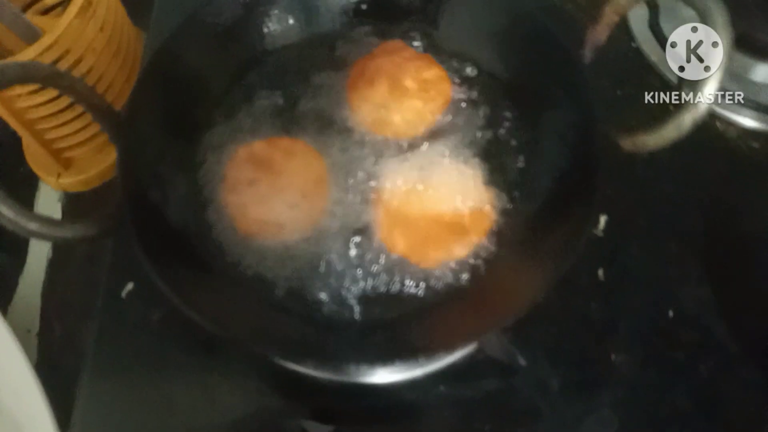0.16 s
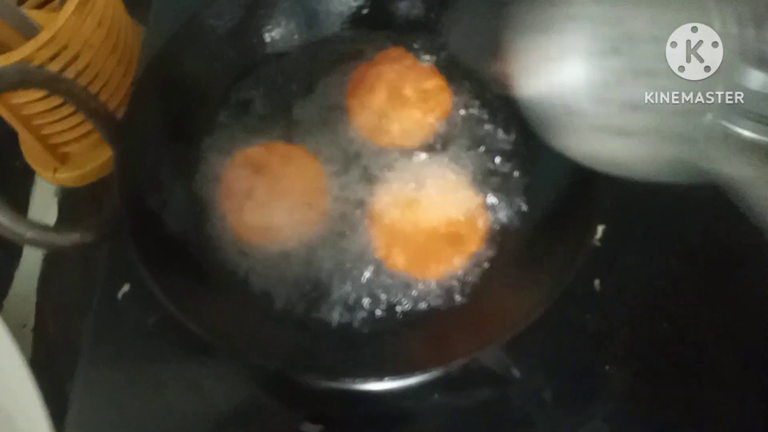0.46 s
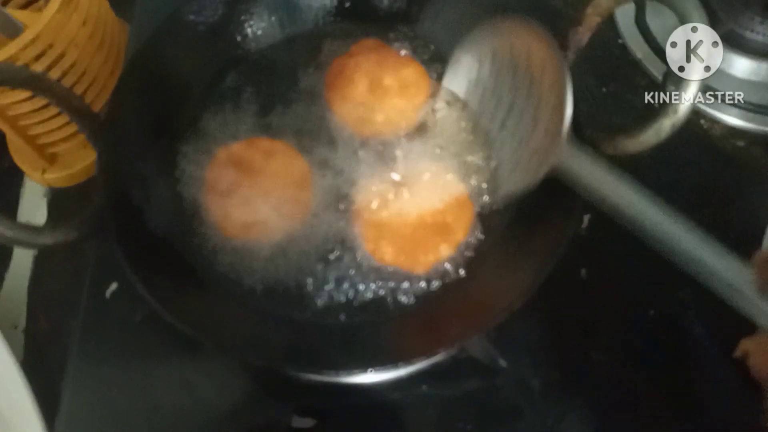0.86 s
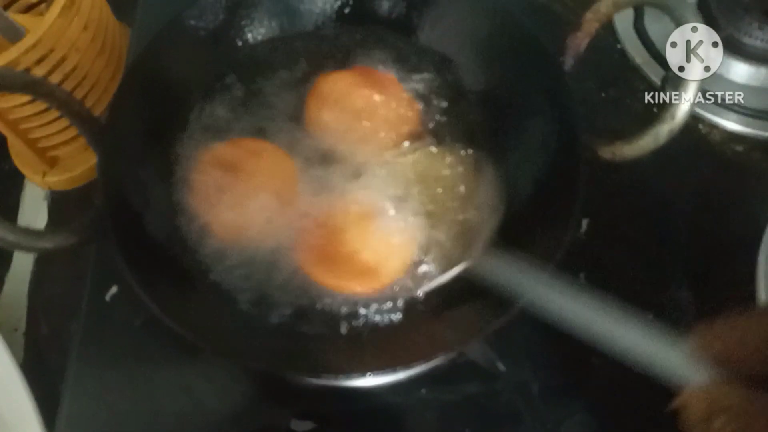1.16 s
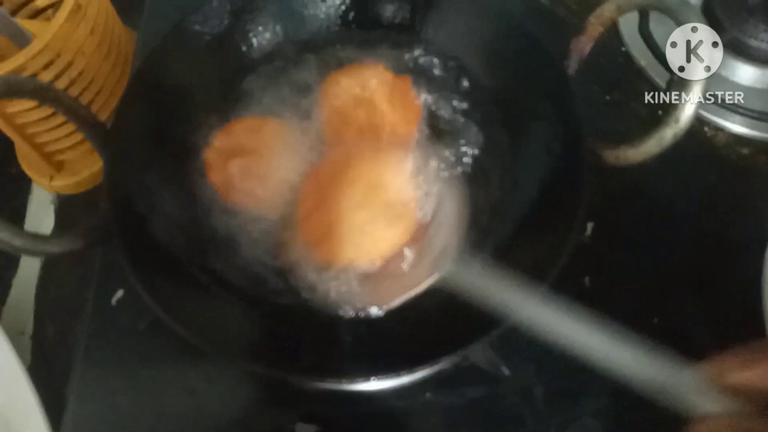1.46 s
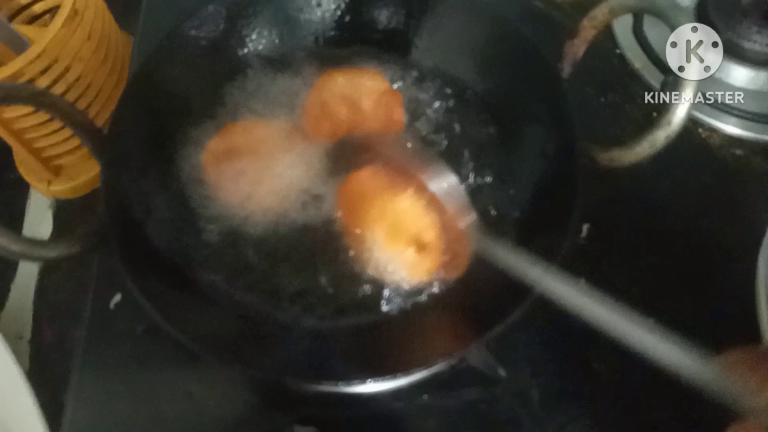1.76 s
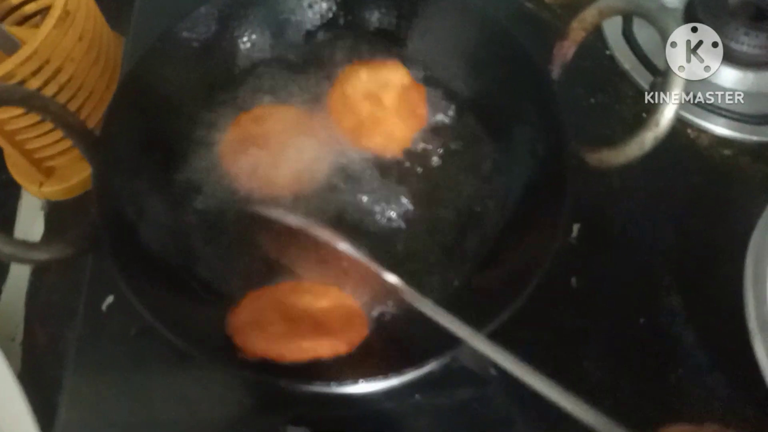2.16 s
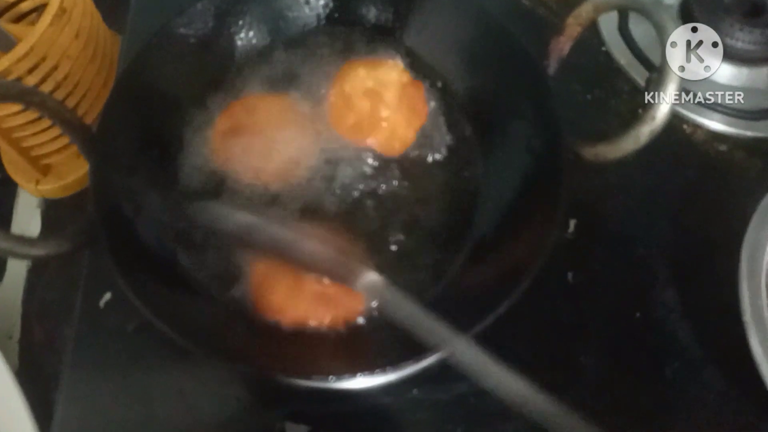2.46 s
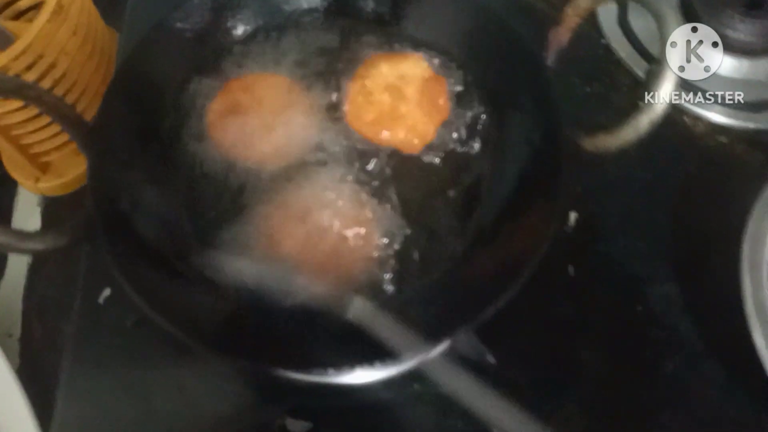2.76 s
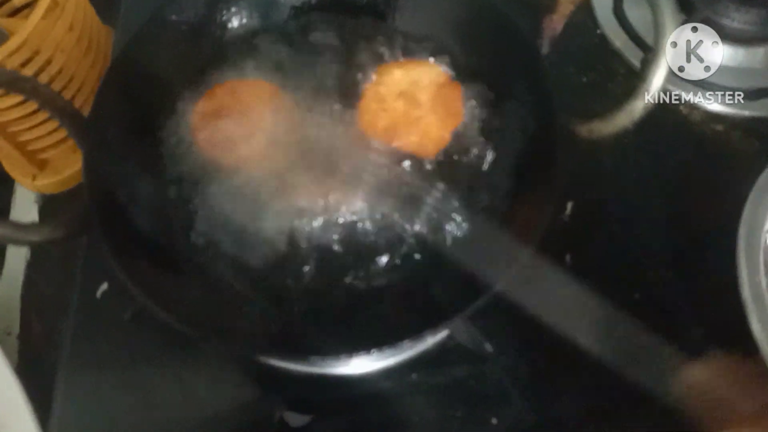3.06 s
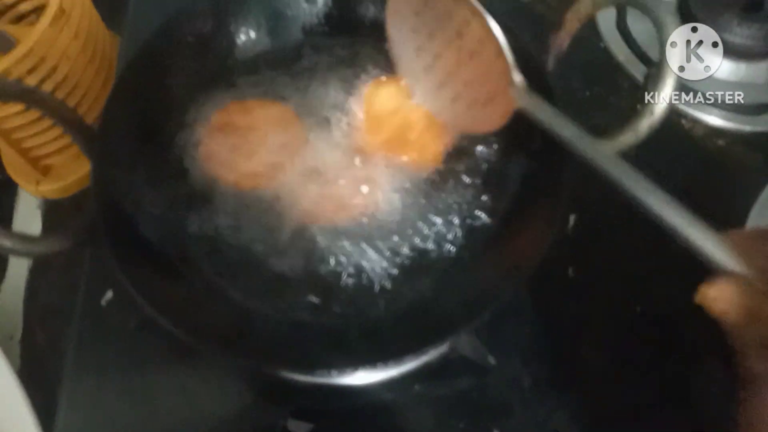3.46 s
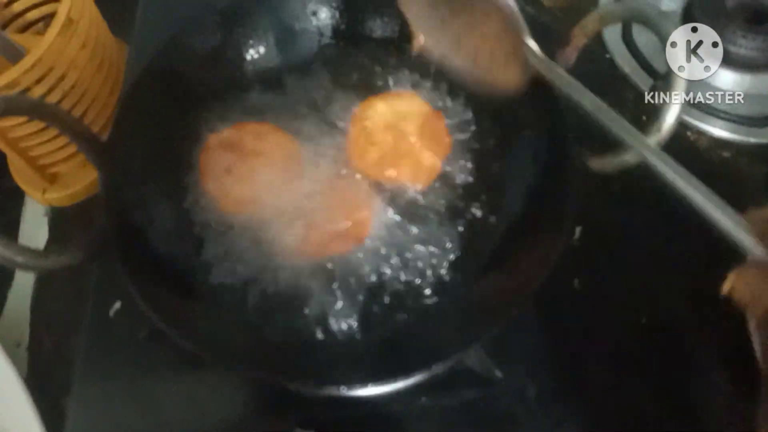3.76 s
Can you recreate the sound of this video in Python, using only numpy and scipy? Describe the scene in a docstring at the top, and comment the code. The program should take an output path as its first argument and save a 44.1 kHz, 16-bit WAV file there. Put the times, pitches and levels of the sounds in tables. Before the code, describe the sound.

Dough rounds sizzle and crackle steadily in hot oil, with spoon taps and dull pan bumps.

```python
"""In a small kitchen, dough rounds fry in hot oil in a steel pan, heard from close above.
Thousands of tiny steam bubbles burst each second as clumped filtered clicks; larger ones ring, a few spit.
A slotted spoon taps the pan with scraped noise and ringing steel, stirs up gurgles and turns one round.
Dull bumps, a rocking pan, an uneven rumble and a faint hum lie below, made of narrow noise and sines."""
import sys
import numpy as np
from scipy import signal
from scipy.fft import rfft, irfft
from scipy.io import wavfile

SR = 44100
rng = np.random.default_rng(int(sys.argv[2]) if len(sys.argv) > 2 else 0)


def store_pcm(level_fs):
    """Save levels as 16-bit WAV."""
    pcm = np.round(np.clip(level_fs, -1, 1) * 32767).astype(np.int16)
    wavfile.write(sys.argv[1], SR, np.atleast_2d(pcm).T)


N = 171990  # length in samples
T = np.arange(N) / SR  # time in seconds


def from_db(db):
    """Decibels to gain."""
    return 10 ** (np.asarray(db) / 20)


def rms_one(x):
    """Scale to an rms of one."""
    return x / np.sqrt(np.mean(x ** 2) + 1e-20)


def curve(rows):
    """Join (seconds, value) points by straight lines."""
    return np.interp(T, *np.transpose(rows))


def drift(rate):
    """Slow chance with a spread of one: noise through two equal low-passes at rate Hz."""
    step = 40  # samples between slow values
    pole = np.exp(-2 * np.pi * rate * step / SR)
    noise = rng.standard_normal(N // step + 2002)
    slow = signal.lfilter([1], [1, -2 * pole, pole * pole], noise)[2000:]  # skip the filter's start
    return np.interp(np.arange(N) / step, np.arange(len(slow)), rms_one(slow))


def resonate(x, hz, width):
    """One resonance, width in Hz, with a gain of one on top."""
    b, a = signal.iirpeak(min(hz, SR / 2 - 1), hz / min(width, SR / 4), fs=SR)
    return signal.lfilter(b, a, x + 1e-18)


def resonate_twice(x, hz, q):
    """Two equal resonances in a row give steeper sides."""
    return resonate(resonate(x, hz, hz / q), hz, hz / q)


def resonant_noise(resonances):
    """Noise through a set of steep-sided resonances, rms one."""
    total = 0
    for hz, width, db in resonances:
        narrow = resonate(rng.standard_normal(N), hz, width)
        total = total + from_db(db) * rms_one(resonate(narrow, hz, 4 * width))
    return rms_one(total)


def clicks(per_s, spread_db):
    """Random clicks of either sign, many small and few large."""
    chance, size, sign = rng.random(N), rng.exponential(1, N), rng.choice([-1, 1], N)
    return (chance < per_s / SR) * sign * from_db(spread_db * np.minimum(size, 6))


def ringing(per_s, spread_db, cycles, hz):
    """Bubbles of one pitch, each dying by 60 dB over some cycles."""
    return resonate(clicks(per_s, spread_db), hz, np.log(1000) / np.pi * hz / cycles)


def click_at(s):
    """A single unit click."""
    return 1. * (np.arange(N) == int(s * SR))


def dying(s, t60):
    """An envelope that starts at s and falls 60 dB in t60 seconds."""
    return (T >= s) * np.exp(-np.log(1000) * np.clip((T - s) / t60, 0, 10))


def swell(s, length):
    """An envelope that peaks after half its length and fades."""
    u = np.clip(2 * (T - s) / length, 0, 20)
    return u * np.exp(1 - u)


def struck(s, modes):
    """Modes set ringing by a blow at s, each a dying sine."""
    return sum(from_db(db) * np.sin(2 * np.pi * hz * (T - s)) * dying(s, t60) for hz, db, t60 in modes)


def colour(x, points):
    """A causal, minimum-phase filter with the given (Hz, dB) response."""
    size = 4096
    hz, db = np.transpose(points)
    log_bins = np.log(np.arange(size // 2 + 1) * SR / size + 1)
    cepstrum = irfft(np.log(from_db(np.interp(log_bins, np.log(hz), db))))
    # fold the cepstrum to make the response causal
    cepstrum[1:size // 2] *= 2
    cepstrum[size // 2 + 1:] = 0
    return signal.fftconvolve(x, irfft(np.exp(rfft(cepstrum))))[:N]


PATCH_DB, PATCHES_PER_S, PATCH_MEAN_DB = 6, 6, -1.5


def patchy(x, count=9):
    """Narrow bands of the lower middle swell and sink, each on its own."""
    edges, out = np.geomspace(260, 1450, count + 2), x
    hz, spectrum = np.arange(N // 2 + 1) * SR / N, rfft(x)
    for k in range(count):
        band = irfft(spectrum * np.interp(hz, edges[k:k + 3], [0, 1, 0]), N)
        gain = from_db(PATCH_MEAN_DB + PATCH_DB * np.minimum(drift(PATCHES_PER_S), 1))
        out = out + band * (gain - 1)
    return out


ROOM_T60_S, NEAR_T60_S, NEAR_DB = 0.16, 0.045, 16


def kitchen(x):
    """Quick reflections from the pan wall and stove, then the tail of the room, as dying noise."""
    t = T[:SR // 3]
    tail = (t > .004) * from_db(-60 * t / ROOM_T60_S)
    near = from_db(NEAR_DB) * (t > .0005) * from_db(-60 * t / NEAR_T60_S)
    echo = rng.standard_normal(len(t)) * (tail + near)
    return signal.fftconvolve(x, echo / np.sqrt(np.sum(echo ** 2)))[:N]


ROOM_LEFT_DB, ROOM_RIGHT_DB, RIGHT_DIRECT_DB = -6.5, 2.5, -4


def from_spot(x, offset_s):
    """One place in the pan reaches each port with its own delay and reflections."""
    direct = np.roll(x, int(offset_s * SR))
    left = x + from_db(ROOM_LEFT_DB) * kitchen(x)
    right = from_db(RIGHT_DIRECT_DB) * direct + from_db(ROOM_RIGHT_DB) * kitchen(x)
    return np.array([left, right])


# Vigour of the frying. Each row: time in seconds, relative level in dB.
VIGOUR = [(0, -14), (.1, -4), (.21, -3.5), (.24, 1.5), (.62, -1), (.76, -0.5), (.88, 0), (1.0, 0.5),
          (1.28, 1), (1.33, -2.5), (1.4, 1), (1.62, 0), (1.7, -0.5), (2.0, -1.5), (2.4, -1), (2.8, 0),
          (3.2, 0.5), (3.9, -1)]


def vigour_db():
    """How hard the oil fries from moment to moment."""
    return curve(VIGOUR)


# Brief dips in level. Each row: start in seconds, depth in dB, length in seconds.
DIPS = [(0.16, 4.5, 0.02), (0.661, 5, 0.019), (0.8, 11, 0.028), (1.65, 4.5, 0.01)]


def dips():
    """The level of the frying and the low layers dips briefly."""
    return from_db(-sum(db * swell(s, length) for s, db, length in DIPS))


# The spoon stirs the oil. Each row: time in seconds, gurgle level in dB.
STIR = [(0, -81), (.38, -79), (.395, -43.5), (.57, -68), (.66, -48), (.78, -48), (.85, -69), (1.15, -59),
        (1.27, -44), (1.34, -66), (1.43, -42.5), (1.56, -69), (1.665, -66), (1.68, -41), (1.71, -50),
        (1.85, -74), (2.4, -76), (2.78, -61), (2.86, -45), (3.05, -56), (3.29, -40.5), (3.36, -54.5),
        (3.9, -58)]
GURGLES_PER_S, GURGLE_SPREAD_DB, GURGLE_CYCLES = 700, 3.5, 18
GURGLE_TILT_DB = -7  # per octave upwards


def gurgle(count=16):
    """Big, low bubbles ring where the spoon moves the oil."""
    total = 0
    for hz in np.geomspace(380, 1700, count):
        rings = rms_one(ringing(GURGLES_PER_S / count, GURGLE_SPREAD_DB, GURGLE_CYCLES, hz))
        total = total + from_db(GURGLE_TILT_DB * np.log2(hz / 1000)) * rings
    return from_db(curve(STIR)) * rms_one(total)


# Faint ring of the pan under the frying. Each row: pitch in Hz, width in Hz, relative level in dB.
PAN_RING = [(497, 45, -5.5), (704, 34, -6), (1075.6, 18, -1), (1173, 19, -2)]
PAN_RING_DB, FLOOR_DB, FLOOR_HZ = -56, -58, 506


def murmur():
    """Gurgling oil, the faint ring of the pan and the dull floor of the kitchen, as patchy noise."""
    floor = rms_one(resonate(rng.standard_normal(N), FLOOR_HZ / 2, FLOOR_HZ))
    steady = from_db(PAN_RING_DB) * resonant_noise(PAN_RING) + from_db(FLOOR_DB) * floor
    return patchy(gurgle() + from_db(vigour_db() / 2) * steady)  # follows half the vigour in dB


# Low rumble. Each row: time in seconds, level in dB.
RUMBLE = [(0, -66), (.13, -63), (.22, -45.5), (.36, -52.5), (.48, -41.5), (.72, -47), (.83, -35), (.9, -44),
          (1.1, -52), (1.55, -45.5), (1.9, -49), (2.1, -58.5), (2.5, -53), (2.7, -53.5), (3.0, -42),
          (3.08, -51), (3.38, -42), (3.58, -56), (3.76, -44.5), (3.9, -55)]
# Resonances of the rumble. Each row: pitch in Hz, width in Hz, relative level in dB.
RUMBLE_TONES = [(107.4, 16.6, -2), (130.5, 19, -10.5), (234.3, 35, -11)]
RUMBLE_FLUTTER_DB, FLUTTERS_PER_S = 2.5, 11.6


def rumble():
    """Narrow bands of low noise with a fluttering level."""
    level_db = curve(RUMBLE) + RUMBLE_FLUTTER_DB * drift(FLUTTERS_PER_S)
    return from_db(level_db) * resonant_noise(RUMBLE_TONES)


# A faint hum comes and goes. Each row: start in seconds, length in seconds, pitch in Hz, level in dB.
HUMS = [(.55, 0.35, 586, -47.5), (.84, 0.307, 594, -45), (1.195, 0.14, 570, -40), (1.51, 0.24, 565, -43.5),
        (2.632, 0.67, 561.6, -44.5), (3.59, 0.21, 584, -45.5)]
HUM_WAVER_HZ, HUM_FLUTTER_DB = 4, 2


def hum():
    """A faint sine, wavering in pitch and level, fades in and out."""
    waver = HUM_WAVER_HZ * drift(FLUTTERS_PER_S)
    flutter = from_db(HUM_FLUTTER_DB * drift(FLUTTERS_PER_S))
    total = 0
    for s, length, hz, db in HUMS:
        fade = np.sqrt(np.sin(np.pi * np.clip((T - s) / length, 0, 1)) + 1e-12)
        total = total + from_db(db) * fade * np.sin(2 * np.pi * np.cumsum(hz + waver) / SR)
    return flutter * total


# The round is pushed and turned. Each row: start in seconds, low boom in dB, knock in dB, length in seconds.
BUMPS = [(0.373, -75, -52, 0.022), (0.766, -53, -41.5, 0.052), (1.416, -40, -45.5, 0.078),
         (1.67, -49, -41, 0.035), (2.832, -35.5, -41.5, 0.082), (3.25, -42.5, -41.5, 0.068)]
# Resonances of the boom. Each row: pitch in Hz, width in Hz, relative level in dB.
BOOM = [(67, 30, -14), (105.7, 15, 1), (129.4, 35, -0.5)]
# Resonances of the knock. Each row: pitch in Hz, width in Hz, relative level in dB.
KNOCK = [(240, 18, -8.5), (311, 24, -7), (362, 54, -18.5), (460, 49, -7), (868, 25, -32)]


def bumps():
    """Dull bumps: short swells of resonant noise, a low boom under a higher knock."""
    boom = sum(from_db(db) * swell(s, length) for s, db, _, length in BUMPS)
    knock = sum(from_db(db) * swell(s, length) for s, _, db, length in BUMPS)
    return boom * resonant_noise(BOOM) + knock * resonant_noise(KNOCK)


# The pan rocks on its stand. Each row: start in seconds, level in dB, pitch in Hz.
THUMPS = [(.748, -37.5, 240), (.768, -29.5, 99), (1.183, -36.5, 304), (3.092, -19.5, 450),
          (3.11, -23.5, 270), (3.152, -24.5, 142)]
# Ring of the pan on its stand. Each row: pitch in Hz, relative level in dB, 60 dB decay in seconds.
STAND = [(106, 4.5, 0.16), (132, -4.5, 0.32), (264, -12, .25), (305, 3.5, 0.27), (383, -2.5, 0.18),
         (434, 3, 0.12), (492, 2, .14), (875, -11.5, 0.17)]
THUMP_RISE_S, THUMP_FOCUS_DB = 0.0084, 5.5  # a soft blow builds up; loss one octave from its pitch


def thumps():
    """The pan rocks on its stand; each soft blow wakes mostly the modes near its own pitch."""
    out = 0
    for s, level_db, pitch in THUMPS:
        modes = [(hz, db - THUMP_FOCUS_DB * np.log2(hz / pitch) ** 2, t60) for hz, db, t60 in STAND]
        rise = np.clip((T - s) / THUMP_RISE_S, 0, 1)
        out = out + from_db(level_db) * rise * struck(s, modes)
    return out


# The spoon touches the pan. Each row: start in seconds, scrape in dB, scrape pitch in Hz, ring in dB.
TAPS = [(0.6692, 2.5, 7160, -31), (0.696, 1, 7100, -28), (0.8122, -11, 12700, -32), (.814, 1, 12600, -42),
        (1.6681, 1, 11900, -36), (1.6696, -5, 5400, -14.5)]
# Ring of spoon and pan. Each row: pitch in Hz, relative level in dB, 60 dB decay in seconds.
STEEL = [(770, 11, 0.084), (1115, -6.5, 0.14), (1210, 1, 0.046), (1765, -2.5, 0.065), (3072, 2, 0.049),
         (3100, -20, .044), (4060, -7, 0.1), (4700, -13, 0.055), (7230, 2, 0.067)]
SCRAPE_T60_S, SCRAPE_Q = 0.008, 1.6


def spoon():
    """Each touch is a tiny scrape of noise and a ring of steel, damped by the oil."""
    out = 0
    for s, scrape_db, hz, ring_db in TAPS:
        scrape = rms_one(resonate(rng.standard_normal(N), hz, hz / SCRAPE_Q)) * dying(s, SCRAPE_T60_S)
        out = out + from_db(scrape_db) * scrape + from_db(ring_db) * struck(s, STEEL)
    return out


# Flurries of larger bubbles. Each row: start in seconds, level in dB, pitch in Hz.
FLURRIES = [(.233, -14.5, 2420), (.398, -24, 2190), (.628, -21, 2480), (1.163, -20, 2460),
            (1.726, -18.5, 2480), (1.831, -23, 2400), (2.413, -19.5, 2480), (2.709, -17.5, 2540),
            (2.819, -12, 2780), (2.902, -24, 2750), (2.99, -20, 2270), (3.414, -14, 2560),
            (3.528, -13, 2920), (3.652, -16, 2170), (3.758, -15.5, 2360), (3.7678, -20, 2660),
            (3.855, -28, 2630)]
FLURRY_S, FLURRY_T60_S = 0.014, 0.029
FLURRY_OCTAVES, FLURRY_LOSS_DB = 0.21, 14  # detuning either way; fading over the whole run


def flurries(count=6):
    """A pocket of steam escapes as a quick run of ringing bubbles of similar pitch."""
    out, t = np.zeros(N + SR), T[:SR // 20]
    decay = np.exp(-np.log(1000) * t / FLURRY_T60_S)
    for s, db, hz in FLURRIES:
        for k, (late, detune) in enumerate(rng.random((count, 2))):
            share = (k + late * (k > 0)) / count  # the first bubble is on time
            pitch = hz * 2 ** (FLURRY_OCTAVES * (2 * detune - 1))
            ring = np.sin(2 * np.pi * pitch * t) * decay
            i = int((s + share * FLURRY_S) * SR)
            out[i:i + len(t)] += from_db(db - FLURRY_LOSS_DB * share) * ring
    return out[:N]


POP_DB, POPS_PER_S, POP_SPREAD_DB, POP_CYCLES = -29, 100, 1.55, 4.6


def pops(count=12):
    """Lone, larger bubbles pop out of the sizzle, ringing for a few cycles at spread pitches."""
    rings = 0
    for hz in np.geomspace(1900, 5500, count):
        # the root evens out the energy across pitches
        rings = rings + ringing(POPS_PER_S / count, POP_SPREAD_DB, POP_CYCLES, hz) / np.sqrt(hz)
    return from_db(POP_DB) * rms_one(rings)


# Loud spits. Each row: start in seconds, relative level in dB, pitch in Hz.
SPITS = [(0.1488, -4.5, 5450), (0.163, -1, 12900), (0.1894, 4, 13900), (0.294, -14, 2400),
         (0.3265, 2, 10600), (0.3999, -6.5, 1990), (0.4596, -7, 3230), (0.552, -7, 10200),
         (0.6011, -10, 14000), (0.639, -9, 2340), (0.7259, -16, 13700), (0.8143, -15, 4240),
         (1.0359, 0, 11500), (1.258, -10, 3300), (1.7625, -15, 2680), (1.787, -9, 6000),
         (1.8025, -10, 3020), (1.8335, -12, 2500), (2.113, -16, 2600), (2.163, -10.5, 3000),
         (2.262, -8.5, 3230), (2.318, -9, 3780), (2.8235, -9.5, 2700), (3.3205, -2.5, 14100),
         (3.377, 3, 13700), (3.4164, -12, 2630), (3.5284, -10, 2930), (3.6475, -0.5, 6900),
         (3.6926, -11, 5140), (3.7663, -6.5, 2850), (3.8412, -9.5, 2750)]
SPIT_DB, SPIT_Q, CRACK_DB = 5.5, 0.97, -13


def spits():
    """Single droplets of water explode with a sharp crack and a pitched snap."""
    out = 0
    for s, db, hz in SPITS:
        crack = click_at(s)
        snap = resonate_twice(crack, hz, SPIT_Q)
        out = out + from_db(db + SPIT_DB) * (snap / np.abs(snap).max() + from_db(CRACK_DB) * crack)
    return out


SPOTS, PAN_SPREAD_S = 4, .00012  # frying spots; largest delay offset between the ports
BUBBLE_DB, BUBBLES_PER_S, BUBBLE_SPREAD_DB, BUBBLE_CYCLES = -29.5, 700, 2.5, 20.6


def bubbles(surge_db, count=5):
    """Larger bubbles of one spot ring briefly at a handful of pitches."""
    pitches = np.geomspace(2000, 3400, count) * rng.uniform(0.885, 1.058, count)
    per_s = BUBBLES_PER_S / count / SPOTS
    rings = sum(ringing(per_s, BUBBLE_SPREAD_DB, BUBBLE_CYCLES, hz) for hz in pitches)
    return from_db(BUBBLE_DB) * rms_one(rings * from_db(surge_db))


# The finest, highest fizz, thinner while the round is out of the oil.
# Each row: time in seconds, relative level in dB.
FIZZ = [(0, 2), (.8, 4.5), (1.2, -3.5), (1.6, 2.5), (2.4, 2), (2.65, -4.5), (3.05, -10), (3.4, -2),
        (3.9, -3.5)]
FIZZ_FROM_HZ, FIZZ_FULL_HZ = 3200, 13700
SIZZLE_DB, BURSTS_PER_S, SIZE_SPREAD_DB, BURST_Q = -22, 9000, 3, 1.35
CLUMP_DB, CLUMPS_PER_S, HISS_DB = 2.5, 77, -25


def sizzle(surge_db, count=8):
    """Tiny bursts of a cycle or two, arriving in clumps, on a smooth hiss of steam."""
    out, fizz_db, clump_db = 0, curve(FIZZ), CLUMP_DB * drift(CLUMPS_PER_S)
    for hz in np.geomspace(1200, 15000, count):
        # how fully this band follows the fizz
        fine = np.clip(np.log(hz / FIZZ_FROM_HZ) / np.log(FIZZ_FULL_HZ / FIZZ_FROM_HZ), 0, 1) ** 2
        bursts = clicks(BURSTS_PER_S / count / SPOTS, SIZE_SPREAD_DB)
        bursts = rms_one(bursts * from_db(surge_db + clump_db))
        drive = from_db(SIZZLE_DB) * bursts + from_db(HISS_DB) * rng.standard_normal(N)
        out = out + from_db(fine * fizz_db) * resonate_twice(drive, hz, BURST_Q)
    return out


SURGE_DB, SURGES_PER_S = 0.93, 4.5


def frying(level):
    """Spots across the pan sizzle and bubble, surging together."""
    surge_db = SURGE_DB * drift(SURGES_PER_S)
    total = 0
    for place in np.linspace(-1, 1, SPOTS):
        spot = level / np.sqrt(SPOTS) * (sizzle(surge_db) + bubbles(surge_db))
        total = total + from_spot(spot, place * PAN_SPREAD_S)
    return total


# Colour of the left microphone port. Each row: frequency in Hz, gain in dB.
LEFT_PORT = [(300, -35), (900, -31.5), (1150, -13.5), (1380, -20.5), (1700, -8.5), (2100, -4), (2500, -0.5),
             (3100, -5.5), (4000, -6), (5200, -12.5), (6000, -9), (6500, -7), (7300, -8.5), (8100, -14.5),
             (10000, -21), (12000, -32.5), (13800, -21), (14800, -18), (15400, -12)]
# Colour of the right microphone port. Each row: frequency in Hz, gain in dB.
RIGHT_PORT = [(300, -31.5), (900, -35), (1150, -18.5), (1700, -20.5), (2700, -28), (3500, -22.5),
              (6500, -23), (8000, -25), (9000, -23), (10000, -21), (11500, -26.5), (13700, -47),
              (14800, -20), (15400, -25)]
RIGHT_LEAD_S, RIGHT_LOW_DB, MURMUR_WIDTH = .00105, -3.5, 0.61


def scene():
    """Several frying spots reach two differently coloured ports, the right one a little earlier."""
    dip = dips()
    level = dip * from_db(vigour_db())
    single = spits() + spoon() + flurries() + level / np.sqrt(SPOTS) * pops()
    pan = patchy(frying(level)) + from_spot(single, 0)
    low = dip * (bumps() + rumble() + hum() + thumps() + murmur())
    spread = dip * MURMUR_WIDTH * murmur()  # opposite sign in the two ports widens the murmur
    left = colour(pan[0], LEFT_PORT) + low + spread
    right = colour(pan[1], RIGHT_PORT) + from_db(RIGHT_LOW_DB) * (low - spread)
    lead = int(RIGHT_LEAD_S * SR)
    return np.array([left, np.pad(right[lead:], (0, lead))])


LOW_CUT_HZ, CUTOFF_HZ = 15, 15500


def record(dry):
    """The deep bass is rolled off and the top is cut steeply."""
    thin = signal.sosfilt(signal.butter(2, LOW_CUT_HZ, "high", fs=SR, output="sos"), dry)
    return signal.sosfilt(signal.ellip(12, .2, 70, CUTOFF_HZ, fs=SR, output="sos"), thin)


dry = scene()
out = record(dry)
store_pcm(out)
```